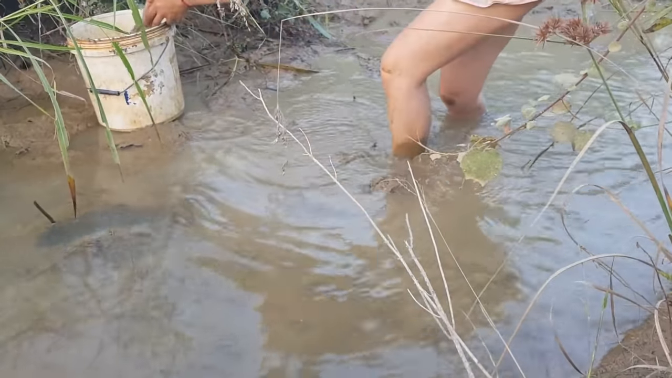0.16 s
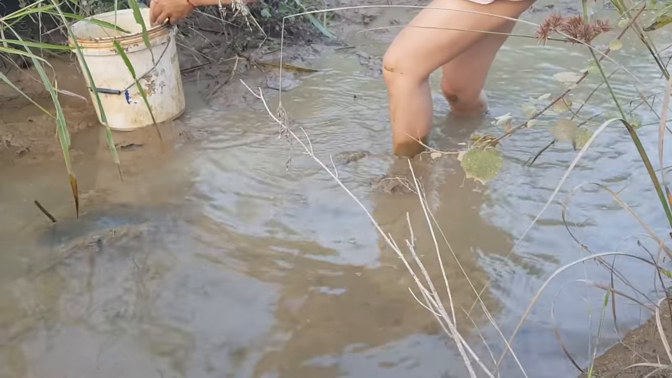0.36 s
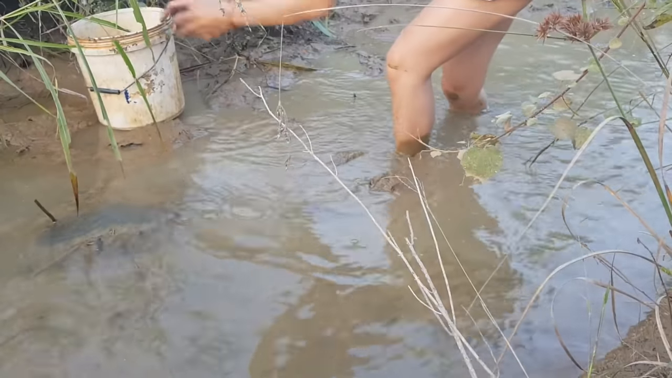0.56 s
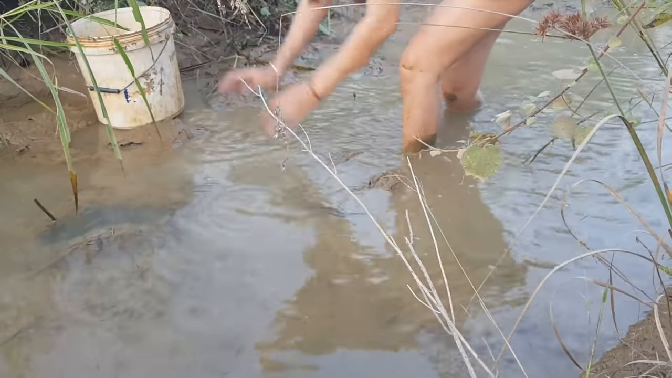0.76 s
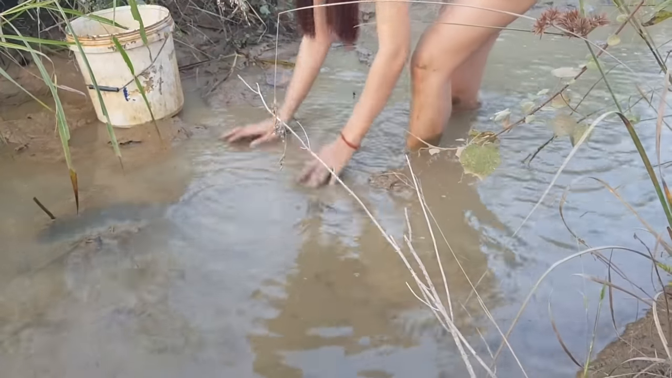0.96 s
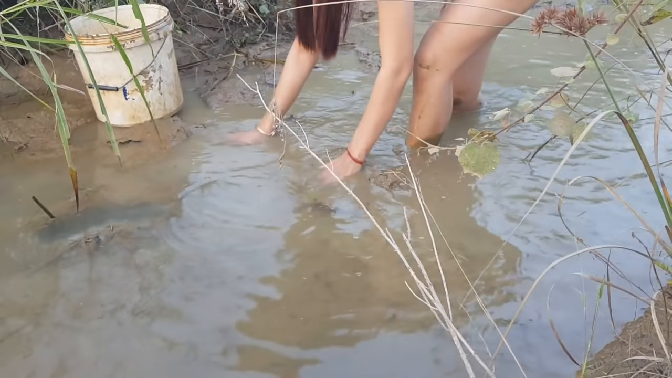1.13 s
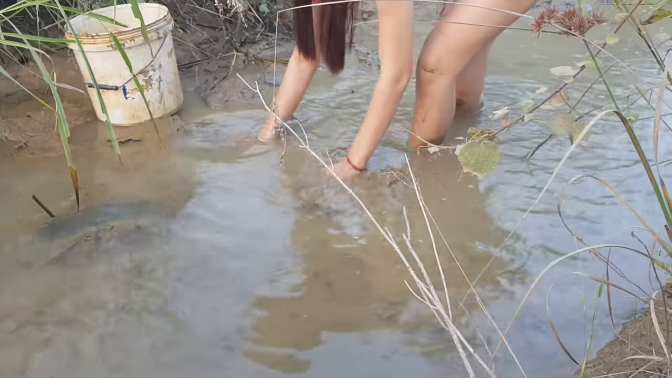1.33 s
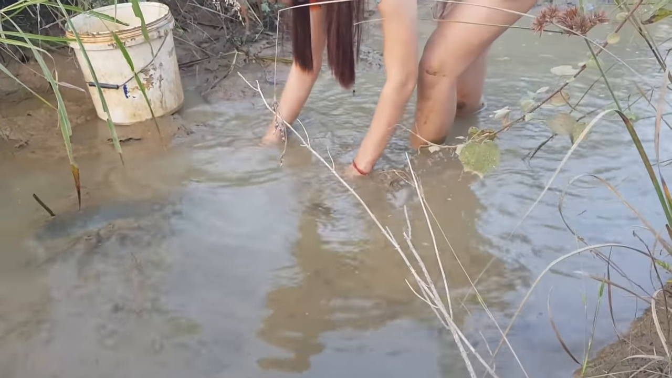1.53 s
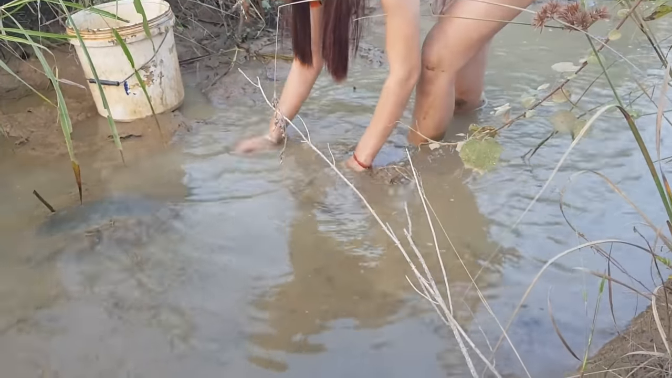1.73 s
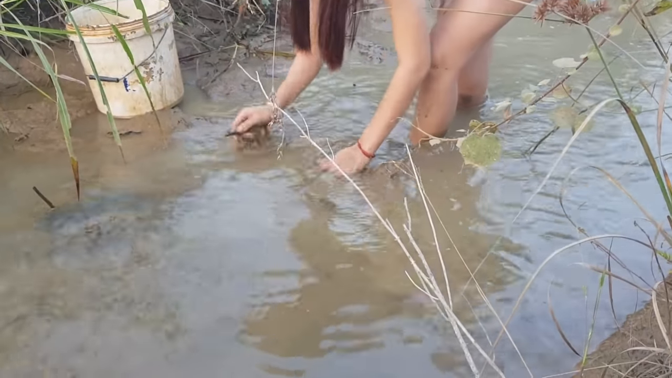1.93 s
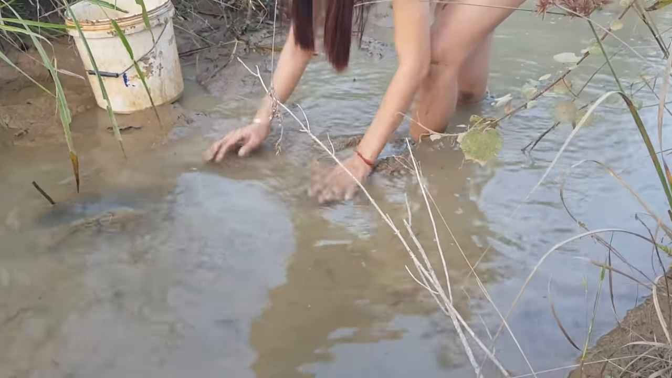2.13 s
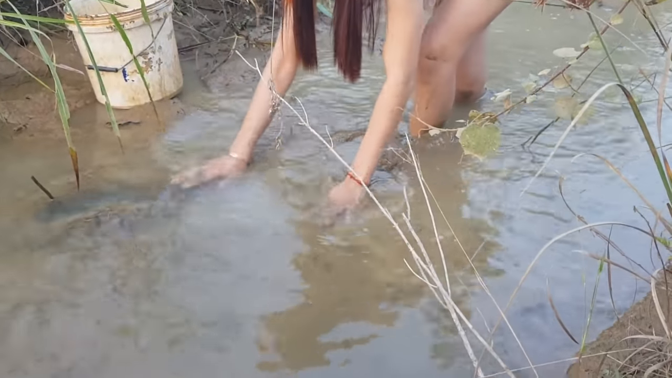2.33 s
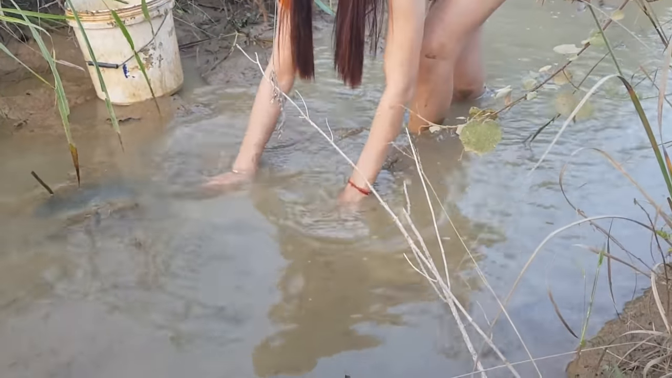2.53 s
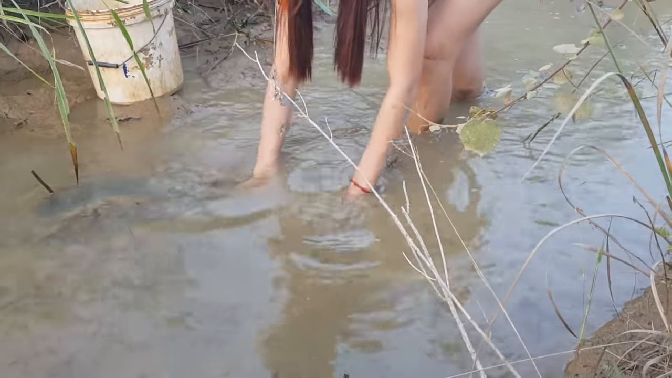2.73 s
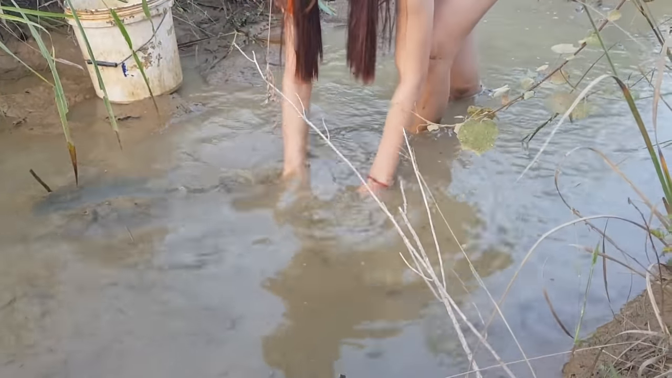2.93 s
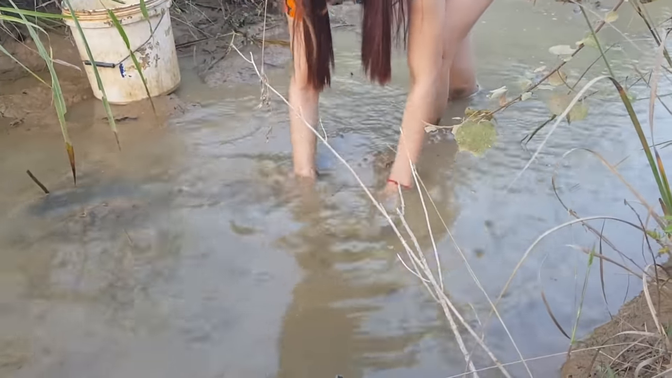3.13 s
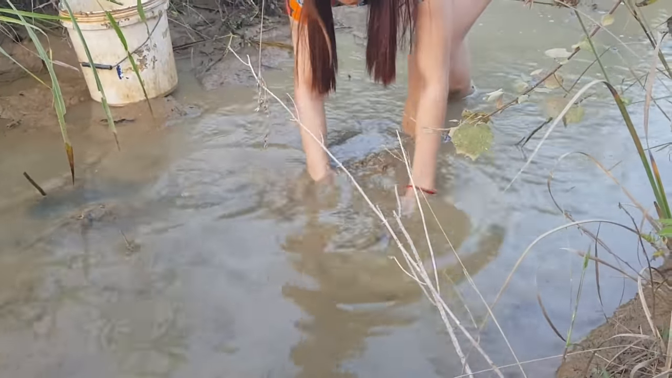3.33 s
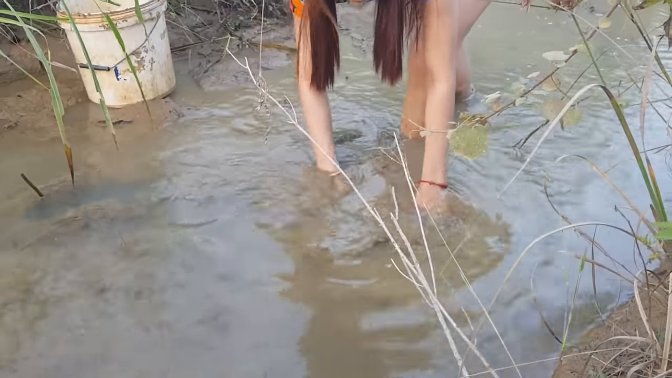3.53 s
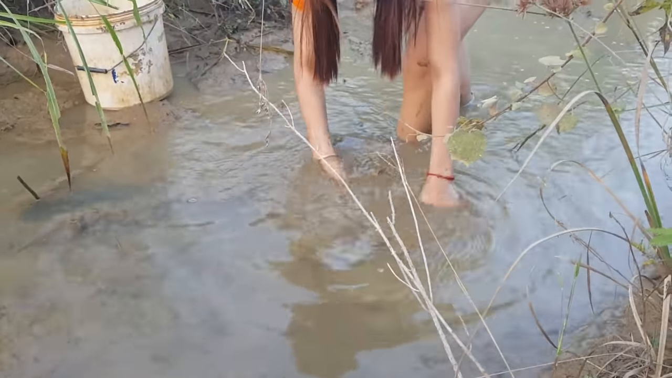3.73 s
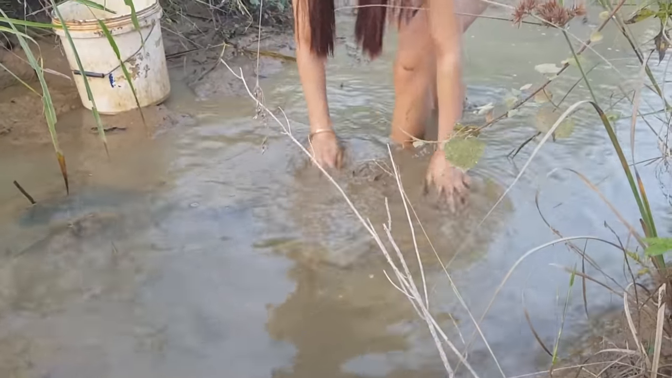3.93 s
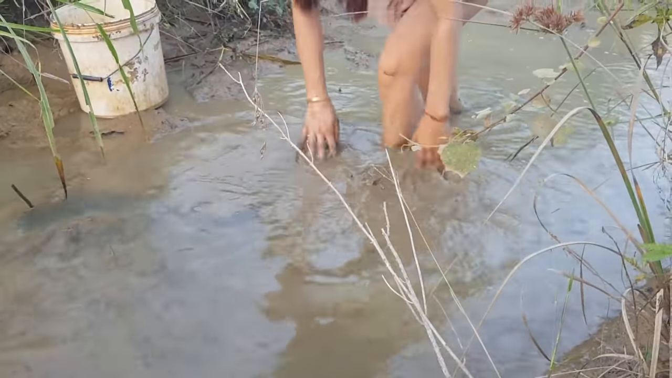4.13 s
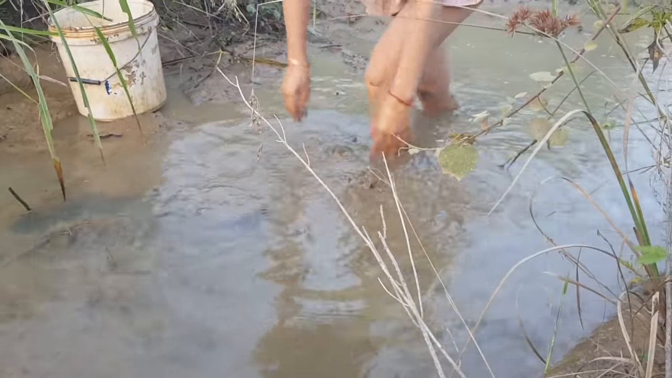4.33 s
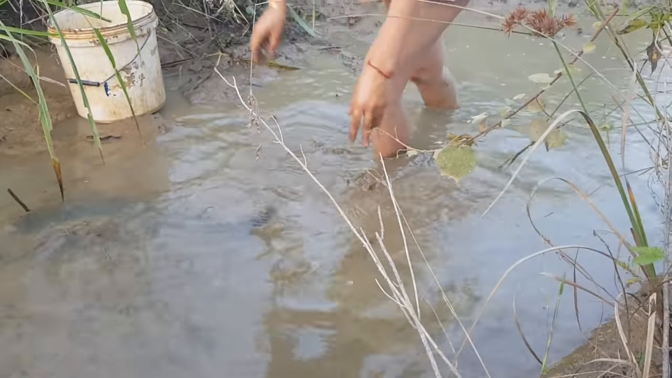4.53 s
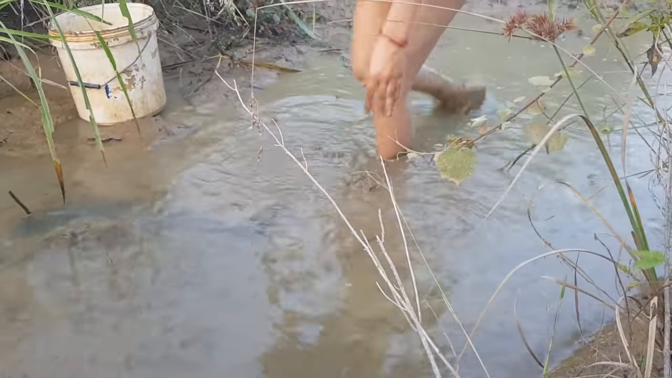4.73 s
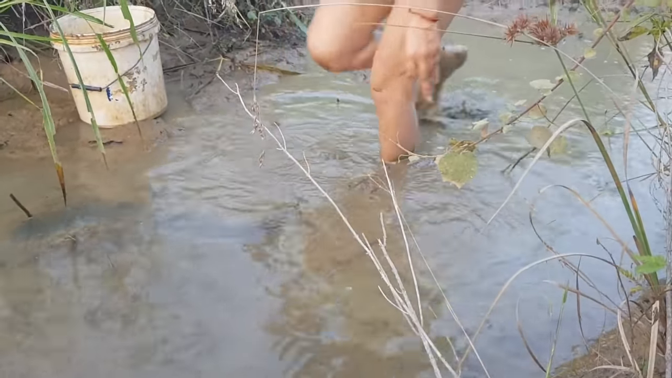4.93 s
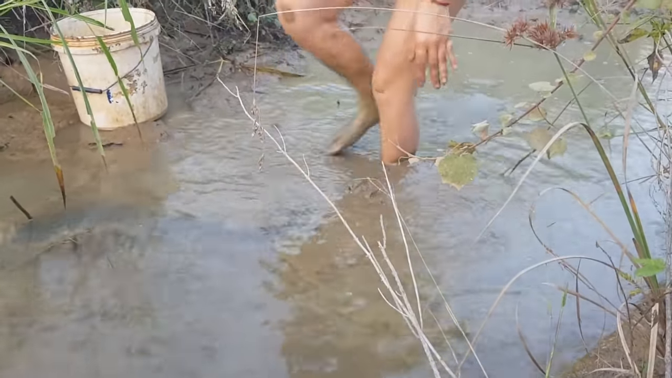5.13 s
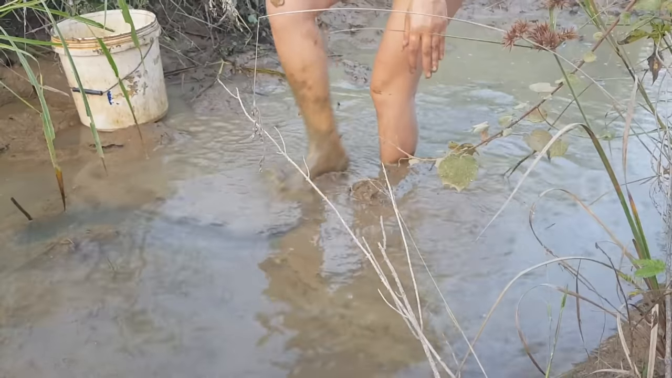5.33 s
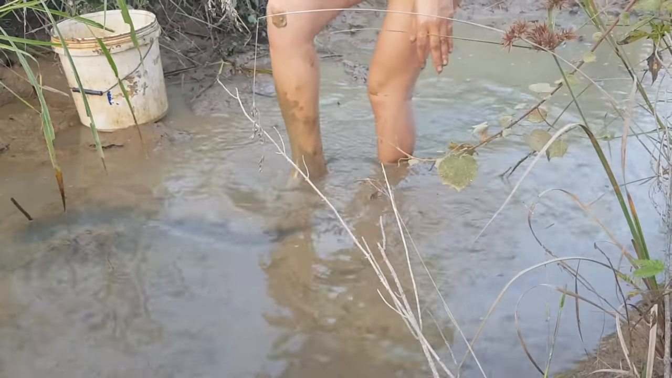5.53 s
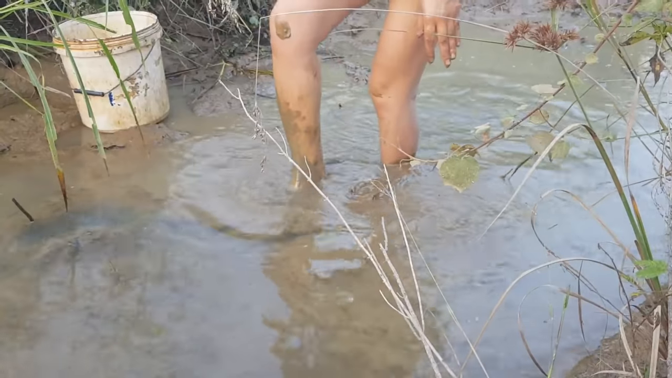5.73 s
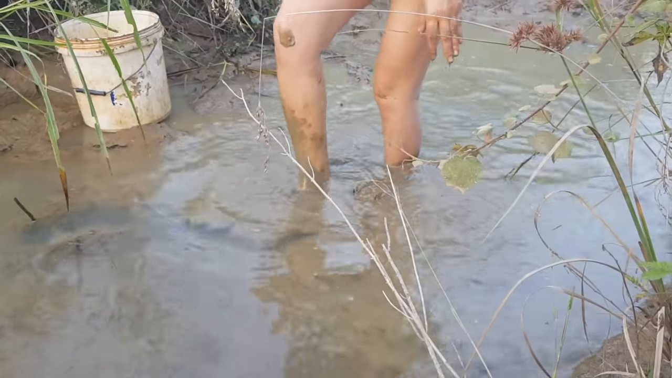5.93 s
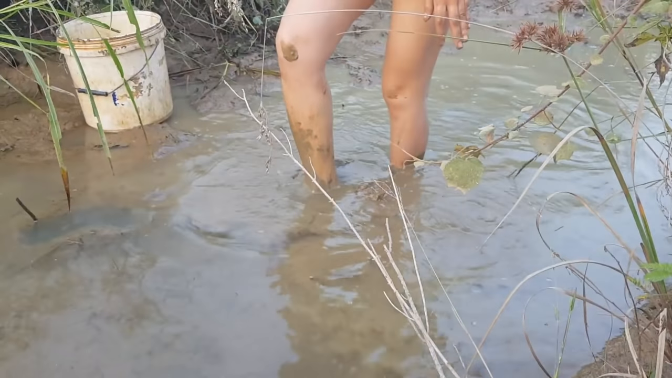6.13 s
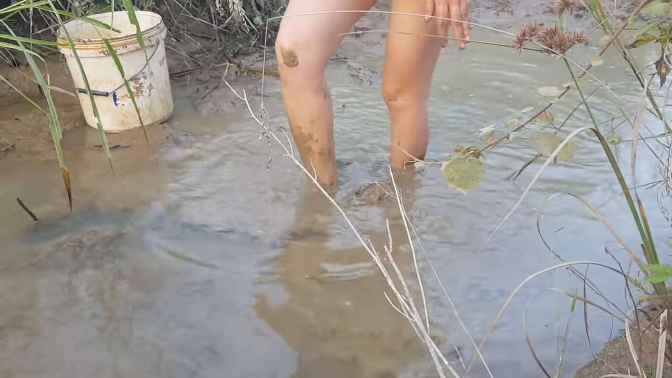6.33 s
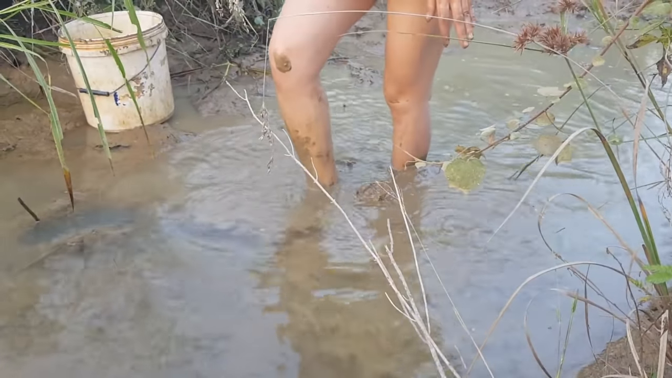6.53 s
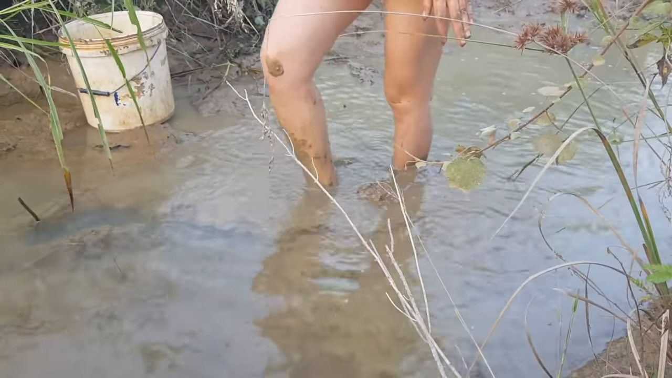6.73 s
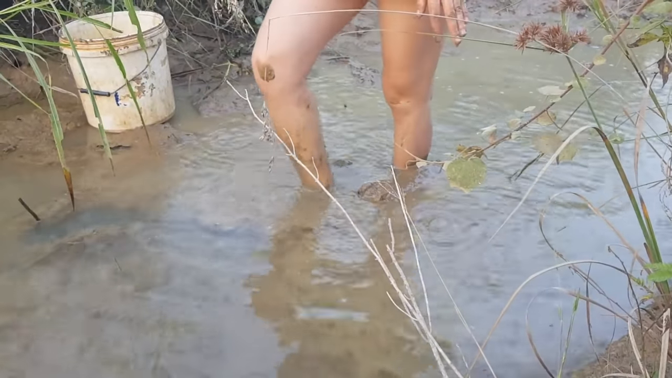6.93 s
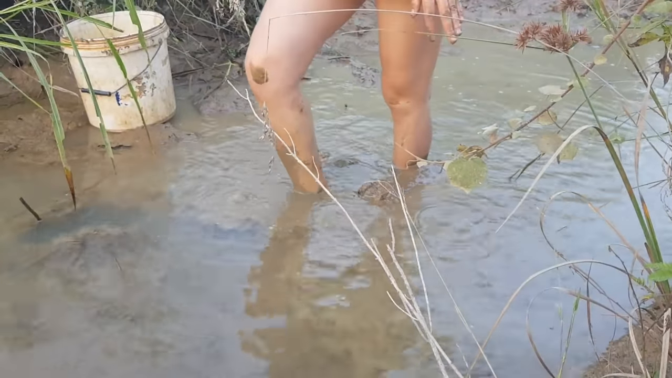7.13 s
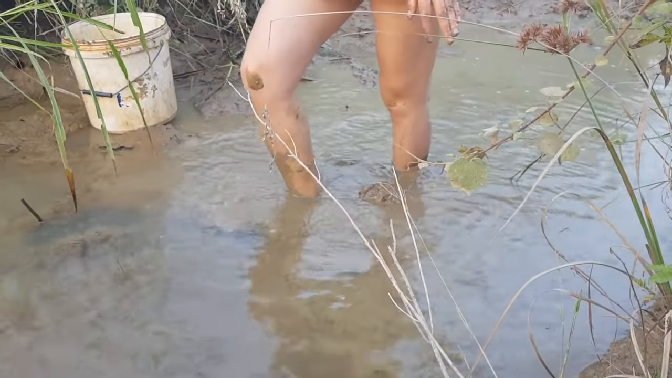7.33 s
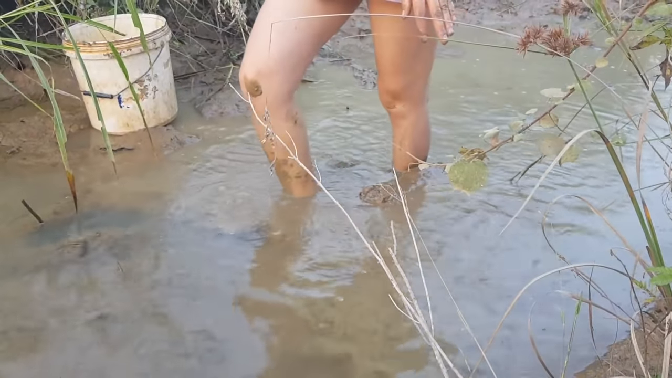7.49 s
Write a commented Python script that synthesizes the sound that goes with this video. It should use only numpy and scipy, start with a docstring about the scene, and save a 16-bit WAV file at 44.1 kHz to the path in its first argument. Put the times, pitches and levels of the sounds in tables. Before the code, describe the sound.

A stereo microphone near the water catches gentle sloshing, bright drips and rising bubble plops as someone gropes and wades in mud. Two dull bucket knocks with a handle rattle come first. Insects trill and chirp over low rumble, soft hiss and a far motor. Around two thirds through, a huge low thump rolls across open fields, silencing the crickets and leaving faint gurgles.

```python
"""Hands and bare feet stir a shallow muddy pond at dusk: noise sloshes, rising tones bubble, droplets snap.
Short decaying tones and a rattle of noise make the knocks on a plastic bucket.
Crickets, built from short high tones, sing on the left until a far blast: one slow wave and rolling noise.
A distant engine, a few gliding sine waves, drones through its gears over rumble and hiss."""
import sys
import numpy as np
from scipy import signal
from scipy.fft import rfft, irfft, next_fast_len
from scipy.io import wavfile
from scipy.ndimage import uniform_filter1d, map_coordinates

SR = 44100
rng = np.random.default_rng(int(sys.argv[2]) if len(sys.argv) > 2 else 0)


def file_out(sig):
    """Save sig as 16-bit WAV at sys.argv[1]."""
    # one column per channel
    cols = np.atleast_2d(sig).T
    # limit, then scale
    lim = np.clip(cols, -1, 1)
    pcm = np.round(lim * 32767).astype(np.int16)
    wavfile.write(sys.argv[1], SR, pcm)


N = 337806  # length of the scene in samples
BLAST_S = 5.365  # arrival of the blast


def amp(db):
    """Turns decibels into a gain."""
    return 10 ** (np.asarray(db) / 20)


def unit(x):
    """Scales x to an rms of 1."""
    return x / np.sqrt(np.mean(x ** 2) + 1e-20)


def along(points, hz):
    """Reads a curve of (Hz, value) points on a log frequency axis."""
    f, v = np.transpose(points)
    return np.interp(np.log(hz + 1), np.log(f + 1), v)


def curves(rows):
    """Gives one value per sample for each column after the time."""
    s, *cols = np.transpose(rows)
    return np.array([np.interp(np.arange(N) / SR, s, c) for c in cols])


def wobble(rate):
    """Draws a smooth random curve with rate knots a second."""
    knots = rng.standard_normal(int(N * rate / SR) + 4)
    return map_coordinates(knots, [np.arange(N) * rate / SR])


def filtered(x, response):
    """Multiplies the spectrum of x by a response of frequency."""
    m = next_fast_len(N + SR // 2)
    return irfft(rfft(x, m) * response(np.fft.rfftfreq(m, 1 / SR)), m)[..., :N]


def rush(spectrum, alike):
    """Makes stereo noise of rms 1 with a given colour and left-right likeness."""
    def shape(hz):
        return amp(np.where(hz < spectrum[0][0], -120, along(spectrum, hz)))

    def mid_and_side(hz):
        turn = np.arccos(np.clip(along(alike, hz), -1, 1)) / 2
        return shape(hz) * [np.cos(turn), np.sin(turn)]

    mid, side = filtered(rng.standard_normal((2, N)), mid_and_side)
    return unit(np.array([mid + side, mid - side]))


def patchy(x, depth_db, bins, frames):
    """Breaks noise into blotches of random gain in time and frequency."""
    z = signal.stft(x, nperseg=128)[2]
    field = uniform_filter1d(rng.standard_normal(z.shape[1:]), size=bins, axis=0)
    field = uniform_filter1d(field, size=frames, axis=1)
    return unit(signal.istft(z * amp(depth_db * unit(field)), nperseg=128)[1][:, :N])


def add(track, s, sound, pan_db=0):
    """Lays a short sound into a stereo track; a positive pan leans left."""
    part = track[:, round(s * SR):][:, :sound.shape[-1]]
    part += amp([[pan_db / 2], [-pan_db / 2]]) * sound[..., :part.shape[1]]


def spaced(x, lag_s):
    """Makes the left channel hear x later than the right by lag_s."""
    sides = np.array([[1], [-1]])
    return filtered(x, lambda hz: np.exp(-1j * np.pi * hz * lag_s * sides))


def engine():
    """A far exhaust: multiples of its firing rate, fluttering on their way through the air."""
    # The engine's course: (time [s], firing rate [Hz], level [dB], lope level [dB])
    engine_course = [(0, 88.3, -55.5, 4), (.3, 78.6, -56.5, 4), (.55, 62.4, -54, -34), (.9, 72.5, -49, -6),
                     (1.3, 75.05, -54.5, -5), (1.6, 61.2, -51, -25), (2.2, 59.1, -50, -17),
                     (3, 60.14, -50, -29), (4, 64.03, -50, -36), (4.5, 68.8, -50.5, -31),
                     (5.05, 73.94, -53, -33), (6.2, 74.53, -50, -34), (6.7, 82.57, -55.5, -14),
                     (7.2, 76.36, -53.5, 0), (7.66, 77.2, -54, -18)]
    # Its tones: (multiple of the firing rate, level [dB])
    engine_orders = [(1, 1), (1.5, -11), (2, -20), (2.5, -28.5)]
    hz, db, lope_db = curves(engine_course)
    phase = 2 * np.pi * np.cumsum(hz) / SR
    total = np.zeros(N)
    for multiple, level in list(engine_orders) + [(0.62, lope_db)]:  # the lope runs below the firing rate
        flutter = amp(level + 1.5 * wobble(14))
        total = total + flutter * np.sin(multiple * phase + .3 * wobble(6))
    return np.sqrt(2) * amp(db) * total


def air():
    """Open air is coloured noise: far traffic rumble, a smooth hiss and a low drone that swells."""
    # Open air: (time [s], far rumble level [dB], hiss level [dB])
    air_levels = [(0.0, -56, -71.5), (7.66, -56.5, -72)]
    # Colour of the rumble: (frequency [Hz], level [dB per Hz])
    rumble_colour = [(21, -32.5), (35, 5.5), (54, -10), (78, 2.5), (232, -12.5), (390, -28.5), (610, -32.5),
                     (1040, -51.5), (2500, -65), (3250, -104)]
    # Colour of the hiss: (frequency [Hz], level [dB per Hz])
    hiss_colour = [(350, -49), (600, -32), (778, -16.5), (1090, -8), (1580, -14), (5470, -22.5),
                   (6990, -22.5), (15600, -19)]
    # Likeness of left and right: (frequency [Hz], likeness [-1 to 1])
    air_likeness = [(60, 0.87), (130, 0.92), (290, 0.75), (640, 0.28), (1400, -0.42), (3000, -0.14)]
    # Faint low band: (time [s], level [dB])
    drone_levels = [(0, -83), (3.4, -107), (3.6, -72.5), (4.1, -88), (4.9, -85), (5.4, -78.5), (7.66, -78)]
    # Colour of that band: (frequency [Hz], level [dB per Hz])
    drone_colour = [(380, -40), (450, -0.5), (560, -3), (650, -14), (800, -120)]
    rumble_db, hiss_db = curves(air_levels)
    rumble = amp(rumble_db) * patchy(rush(rumble_colour, air_likeness), 0.44, bins=1, frames=60)
    hiss = amp(hiss_db) * rush(hiss_colour, air_likeness)
    drone = amp(curves(drone_levels)[0]) * rush(drone_colour, air_likeness)
    return rumble + hiss + drone


def near_crickets():
    """Each chirp is a short high tone with a rough strength, as the wing's file scrapes unevenly."""
    # Crickets, two on a steady beat and one uneven: (pitch [Hz], chirps a phrase [count],
    # gap between chirps [s], level [dB], phrase starts [s])
    cricket_phrases = [(7150, 3, .051, -69.5, .1665 + .2163 * np.arange(25)),
                       (7140, 2, .052, -69, .014 + .2317 * np.arange(24)),
                       (7590, 2, .055, -70.5, [.118, .344, .59, .865, 1.11, 1.344, 1.59, 1.806, 2.063, 2.32, 2.585, 2.816, 3.056, 3.293, 3.538, 3.772, 4.012, 4.248, 4.49, 4.72, 4.96, 5.205])]
    sag_hz_per_s, scatter_s = 2600, 0.0022  # fall of pitch within a chirp; unsteadiness of the beat
    hush_db_per_s = 150  # fading after the blast
    out, t = np.zeros((2, N)), np.arange(round(0.03 * SR)) / SR
    soft = np.sin(np.pi * t / t[-1]) ** .8
    for hz, count, gap, db, starts in cricket_phrases:
        sag = sag_hz_per_s * (3 if hz > 7400 else 1)  # the highest cricket sags most
        for s in [start + k * gap for start in starts for k in range(count)]:
            rasp = amp(3 * unit(uniform_filter1d(rng.standard_normal(len(t)), size=70)))
            cycles = (hz + sag * (t[-1] - t) / 2) * t * (1 + 0.0054 * rng.normal())
            stroke = soft * rasp * np.sin(2 * np.pi * cycles + rng.uniform(0, 3.3))
            late = abs(rng.normal(0, scatter_s)) - .004
            add(out, s + late, amp(db + rng.normal(0, 0.55)) * stroke, pan_db=21.5)
    out = out * amp(-hush_db_per_s * np.clip(np.arange(N) / SR - BLAST_S, 0, None))  # the blast hushes them
    return out * amp(wobble(25) + 1.2 * wobble(3.04))  # their strength wavers


def far_crickets():
    """Many far crickets blur into one flickering band of noise."""
    # Far crickets together: (time [s], level [dB])
    chorus_levels = [(0, -71.5), (2, -72), (5.4, -70.5), (5.6, -99.5), (7.05, -95.5), (7.3, -78),
                     (7.66, -92)]
    colour = [(6300, -31), (6900, -4.5), (7150, 0.5), (7600, 0.0), (7900, -11.0), (8300, -47.0)]
    return amp(curves(chorus_levels)[0] + 1.3 * wobble(36)) * rush(colour, [(7000, 0.013)])


def trills():
    """Trilling insects: a high tone beats in pulses, and each pulse slides down in pitch."""
    # Trills: (start [s], end [s], start pitch [Hz], end pitch [Hz], slide [Hz], pulses [per s], level [dB])
    trill_rows = [(0, 0.46, 4490, 4550, 405, 63, -82), (1.148, 1.68, 4670, 4680, 408, 50, -84.5),
                  (2.491, 3.059, 4640, 4550, 395, 96, -84), (0.619, 0.718, 9400, 9240, 303, 65, -60),
                  (2.607, 2.703, 9520, 9520, 446, 55, -62), (2.797, 2.907, 9100, 9470, 300, 49, -68),
                  (3.5, 3.557, 9030, 9530, 298, 61, -67)]
    # Single pips of the high insect: (time [s], pitch [Hz], level [dB])
    pip_rows = [(2.727, 9300, -65), (3.943, 9360, -72), (4.19, 9450, -66), (4.428, 9480, -69)]
    pip_s = 0.0166  # length of a pip, which is one pulse
    pips = [(s, s + pip_s, hz, hz, 300, 1 / pip_s, db) for s, hz, db in pip_rows]
    out = np.zeros((2, N))
    for start, end, hz0, hz1, width_hz, rate, db in list(trill_rows) + pips:
        t = np.arange(round((end - start) * SR)) / SR
        beat = t * rate % 1
        blur = 2.12 * (hz0 < 6000)  # the lower trill is far off and blurred
        hz = hz0 + (hz1 - hz0) * t / t[-1] + width_hz * (.5 - beat)
        jitter = unit(uniform_filter1d(rng.standard_normal((2, len(t))), size=60))
        hz = hz + (0.284 + 0.185 * blur) * width_hz * jitter
        tone = np.sin(2 * np.pi * np.cumsum(hz, axis=1) / SR)
        pulses = blur + np.sin(np.pi * beat) ** 2
        swell = np.sin(np.pi * t / t[-1]) ** .5
        add(out, start, amp(db + 3.5 * wobble(39.0)[:len(t)]) * swell * pulses * tone)
    return out


def insects():
    """All insects: near crickets, the far chorus and the trills."""
    return near_crickets() + far_crickets() + trills()


def movement(calm_db):
    """Gives levels in dB of gurgle, slosh and spray: each movement swells, holds and settles."""
    # Hands and feet moving the water: (start [s], swell [s], hold [s], settling speed [factor],
    # gurgle level [dB], slosh level [dB], spray level [dB])
    water_moves = [(0, 0.0021, 0.0093, 1, -64.5, -70, -89), (0.42, 0.052, 0.044, 0.86, -59, -66.5, -70),
                   (0.55, 0.064, 0.072, 0.72, -76, -89, -65.5), (1.047, 0.035, 0.03, 1.5, -71.5, -63, -53),
                   (1.914, 0.025, 0.13, 1.01, -77.5, -75.5, -73),
                   (2.076, 0.019, 0.083, 1.2, -82, -67.5, -89), (2.153, 0.11, 0.019, 1.4, -64, -68, -70),
                   (2.291, 0.041, 0.025, 1.1, -71, -66.5, -56), (2.371, 0.043, 0.1, 0.83, -72, -68.5, -73),
                   (4.007, 0.083, 0.039, 0.9, -90, -68, -69.5),
                   (4.083, 0.075, 0.048, 0.71, -63, -65.5, -78),
                   (4.82, 0.048, 0.026, 1.12, -67.5, -61, -65), (4.879, 0.082, 0.16, 1.14, -57, -55, -61.5),
                   (5.153, 0.013, 0.076, 1, -96, -66.5, -66), (5.281, 0.045, 0.047, 1, -76, -58, -65.5),
                   (5.44, 0.026, 0.026, 1.9, -80, -64.5, -70), (5.593, 0.16, 0.87, 0.85, -80, -84.5, -77),
                   (6.612, 0.38, 0.578, 1.01, -79, -104, -100)]
    # Settling before the speed factor: gurgle, slosh, spray [dB per s]
    settle_db_per_s = (213, 103, 199)
    swell_db = 18  # a movement swells through this range
    t, power = np.arange(N) / SR, amp(calm_db)[:, None] ** 2
    for s, swell, hold, speed, *db in water_moves:
        rising = swell_db * np.clip(1 - (t - s) / max(swell, .002), 0, None)
        rising = rising + 200 * (t < s)  # silent before it starts
        falling = speed * np.outer(settle_db_per_s, np.clip(t - s - swell - hold, 0, None))
        power = power + amp(np.array(db)[:, None] - rising - falling) ** 2
    return 10 * np.log10(power)


def fizz(level_db, hz, octaves, cycles, count):
    """Scatters many tiny bubbles at random, each a short tone that rises and fades."""
    draw, k = rng.random((count, 4)), np.arange(900)
    start = (draw[:, :1] * (N - 900)).astype(int)
    step = hz * 2 ** (octaves * (2 * draw[:, 1:2] - 1)) / SR  # cycles per sample
    age = k * step / cycles
    size = amp(-2.4 * np.log(draw[:, 2:3]))  # a few are much stronger
    grain = size * age * np.exp(-4 * age) * np.sin(2 * np.pi * k * step * (1 + 0.134 * age))
    pan = amp(1.1 * (draw[:, 3:] + 1.0))
    pair = [np.bincount((start + k).ravel(), (grain * g).ravel(), N) for g in (pan, 1 / pan)]
    return amp(level_db) * unit(np.array(pair))


def surface(x):
    """The bounce off the water surface cancels one band of a sound born there."""
    dip_hz, half_width_hz, share = 2530, 145, 0.91
    return filtered(x, lambda hz: 1 - share / (1 + ((hz - dip_hz) / half_width_hz) ** 2))


def placed(x):
    """The wader works left of centre at first, then a little to the right, heard as a tiny time lag."""
    turn_s, first_lag_s, later_lag_s = 2.8, -.00011, .00006
    early = np.arange(N) < turn_s * SR
    return spaced(x * early, first_lag_s) + spaced(x * ~early, later_lag_s)


def stirring():
    """Moving water: blotchy noise in three bands, with small bubbles and fine patter scattered over it."""
    # Colours of the three bands: (frequency [Hz], level [dB per Hz])
    gurgle_colour = [(500, -10), (800, -12.5), (1300, 3.5), (2100, -0.5), (2600, -24), (3200, -41)]
    slosh_colour = [(2200, -11), (2700, -5.5), (3500, 0), (4300, 0.5), (5200, -6.5), (6500, -1),
                    (8000, -10.5)]
    spray_colour = [(6000, -2.5), (7500, 2.5), (10000, -9.5), (12000, -6.5), (15500, -14)]
    # The pond left alone: gurgle, slosh, spray level [dB]
    calm_levels = (-86.5, -81.5, -82)
    gurgle_db, slosh_db, spray_db = movement(calm_levels)
    gurgle = amp(gurgle_db) * patchy(rush(gurgle_colour, [(1000, 0.2)]), 7.1, bins=2, frames=6)
    slosh = amp(slosh_db) * patchy(rush(slosh_colour, [(1000, 0.15)]), 4.4, bins=9, frames=3)
    spray = amp(spray_db) * patchy(rush(spray_colour, [(1000, .2)]), 3.5, bins=10, frames=5)
    gurgle_db, slosh_db, spray_db = movement(np.full(3, -120))  # still water throws almost no grains
    small = fizz(gurgle_db - 1.5, 1080, 0.7, 22, count=2000)
    small = small + fizz(slosh_db - 3, 4050, 0.65, 15, count=900)
    patter = fizz(spray_db - 8.0, 7040, 0.69, 23.0, count=350)
    patter = patter + fizz(slosh_db - 11, 3730, 0.75, 5.5, count=450)
    return gurgle + slosh + spray + placed(surface(small + patter))


def bubble(hz, life, rise, fade_db, bend, ripple_db):
    """One air pocket rings, its pitch climbing as it nears the surface, then it bursts."""
    age = np.linspace(0, 1, round(life * SR))
    swell = 0.47 / life / hz + 0.063 * rise  # share of life; a steep climb swells slowly
    shape = (1 - np.exp(-age / swell)) * amp(-fade_db * age / (1 + 0.14 * rise))
    shape = shape * np.sqrt(1 - age ** 4)  # the burst ends it
    ripple = unit(uniform_filter1d(rng.standard_normal((2, len(age))), size=130))
    pitch = hz * 2 ** (rise * age ** bend)  # a larger bend climbs later
    return shape * amp(ripple_db * ripple) * np.sin(2 * np.pi * np.cumsum(pitch) / SR)


def bubbles():
    """Free bubbles live for a count of cycles; gulps of air from the mud dwell low, then swoop up."""
    # Free bubbles: (time [s], level [dB], start pitch [Hz], pitch rise [octaves])
    bubble_rows = [(0.224, -63, 920, 1.3), (0.251, -58, 1110, 0.15), (.643, -64.5, 900, 0.25),
                   (.712, -67, 900, 0.26), (.77, -67.5, 926, 0.65), (.885, -67, 1010, 0.22),
                   (.943, -70, 1060, .6), (1.104, -54, 1500, 0.4), (1.172, -61.5, 1830, 0.12),
                   (1.984, -58.5, 940, 0.088), (2.045, -64, 1400, .05), (2.198, -62, 1140, 0.1),
                   (2.212, -67, 826, .1), (2.242, -57, 1450, .1), (2.245, -56.5, 897, 1.31),
                   (2.387, -56.5, 1070, 0.48), (2.438, -39.5, 1200, 0.27), (2.441, -56.5, 646, 0.18),
                   (2.77, -65, 1186, 0.38), (2.926, -45, 1165, 0.67), (3.028, -67.5, 650, 0.064),
                   (3.138, -61, 1255, 0.73), (3.143, -52.5, 1655, 0.091), (3.74, -63.5, 1370, 0.2),
                   (4.078, -54.5, 1650, 0.046), (4.084, -57, 1096, 0.085), (4.131, -37.5, 1244, 0.94),
                   (4.164, -54.5, 862, 0.12), (4.189, -56, 775, 0.059), (4.197, -52, 1186, 0.2),
                   (4.285, -51.5, 1350, 0.24), (4.845, -61.5, 1790, .05), (4.852, -53.5, 944, 0.22),
                   (4.983, -43, 1450, .15), (5.068, -47, 1540, 0.093), (5.628, -54, 1110, 0.11),
                   (5.937, -56.5, 1133, 0.23), (6.655, -64, 1056, 0.52), (6.68, -68, 1170, 0.041),
                   (6.8, -65.5, 867, 0.9), (6.94, -69, 1035, 0.68), (6.95, -65, 820, 0.66),
                   (7.03, -67, 950, 0.63), (7.165, -63, 806, 0.91), (7.095, -63.5, 1077, 0.26),
                   (7.128, -74, 1400, .6), (7.27, -68, 1191, 0.11), (7.3, -65, 1050, .5),
                   (7.33, -66, 740, 0.66), (7.37, -64, 1160, 0.12), (7.489, -64.5, 920, 0.38),
                   (7.523, -63, 1500, 0.19)]
    # Air escaping from the mud round the foot: (time [s], level [dB], length [s], pitch rise [octaves])
    gulp_rows = [(6.706, -61, 0.048, 0.11), (6.768, -53.5, 0.065, 0.61), (6.825, -56, 0.054, 0.15),
                 (6.894, -59, 0.06, 0.56), (7.035, -61.5, 0.061, 1.5), (7.143, -65, 0.053, 0.22),
                 (7.194, -60, 0.052, 1.6), (7.285, -61, 0.0485, 0.36), (7.342, -63, 0.085, 0.069),
                 (7.377, -60.5, 0.039, 1), (7.426, -61, 0.052, 0.11)]
    out = np.zeros((2, N))
    for s, db, hz, rise in bubble_rows:
        life = (20 + 13 * rise) / hz  # counted in cycles of the start pitch
        sound = bubble(hz, life, rise, fade_db=14, bend=1.5, ripple_db=4.2)
        add(out, s, amp(db) * sound, pan_db=1.5)
    for s, db, life, rise in gulp_rows:
        hz = 515.6 * amp(0.37 * rng.normal())
        add(out, s, amp(db) * bubble(hz, life, rise, fade_db=14.5, bend=2.43, ripple_db=5.5))
    return spaced(out, -0.000025)


def bucket():
    """Knocks ring the air column and the plastic wall as fading tones; the wire handle rattles as noise."""
    # Ringing tones: (pitch [Hz], time to fade by 60 dB [s], attack [s])
    bucket_modes = [(275.3, 0.077, 0.017), (150, 0.024, 0.013), (647, 0.044, 0.0071), (1380, 0.024, 0.0001)]
    # Blows: (time [s], level of each of the four tones in turn [dB], rattle level [dB])
    bucket_blows = [(0.4392, -9.5, -18, -36, -34, -57), (0.504, -21.5, -7, -27.5, -25.5, -30.5),
                    (.676, -41.5, -15, -78, -66, -62)]
    # Colour of the rattle: (frequency [Hz], level [dB per Hz])
    rattle_colour = [(300, -5.5), (1500, -8), (2600, -14.5), (4500, -17.5), (6500, -9.5), (9000, -19.5),
                     (15500, -29)]
    out, t = np.zeros((2, N)), np.arange(SR // 4) / SR
    for s, *mode_db, rattle_db in bucket_blows:
        ring = np.zeros(len(t))
        for db, (hz, t60, attack) in zip(mode_db, bucket_modes):
            ring += amp(db - 60 * t / t60) * (1 - np.exp(-t / attack)) * np.sin(2 * np.pi * hz * t)
        noise = rush(rattle_colour, [(300, 0.73), (6000, 0.26)])[:, :len(t)]
        rattle = amp(rattle_db - 60 * t / 0.068) * (1 - np.exp(-t / 0.00088)) * noise
        add(out, s, ring + rattle)
    return spaced(out, -0.00015)


def drops():
    """A droplet is a short ping in a burst of noise gathered round the same pitch."""
    # Droplets snapping on the surface: (time [s], level [dB], centre [Hz], width [octaves])
    drop_rows = [(1.0773, -39, 7100, 0.93), (1.094, -48, 12500, 0.33), (1.111, -51, 6500, 0.54),
                 (1.217, -55, 3600, 0.15), (1.933, -47, 6370, 0.21), (1.961, -51, 1736, 0.17),
                 (1.973, -55, 3700, 0.3), (2.042, -56.5, 3510, 0.1), (2.105, -51, 5870, 0.48),
                 (2.114, -52, 3800, 0.22), (2.129, -60, 3670, 0.13), (2.155, -53, 3530, .2),
                 (2.159, -53, 5304, 0.15), (2.172, -50.5, 3580, 0.16), (2.172, -57, 2010, .2),
                 (2.173, -44.5, 6400, 0.21), (2.2222, -46.5, 4260, 0.35), (2.263, -50, 4250, 0.16),
                 (2.33, -58, 3240, 0.54), (2.339, -45.5, 4400, .08), (2.3352, -40, 6600, 1.2),
                 (2.3443, -32.5, 12500, 0.31), (2.343, -35.5, 5960, 0.61), (2.362, -44, 6650, 0.62),
                 (2.433, -52, 4250, 0.19), (3.206, -57, 1657, 0.11), (3.739, -64.5, 2800, 1.4),
                 (4.04, -52, 4300, 0.24), (4.0641, -58, 4020, 0.25), (4.088, -46, 3760, 0.2),
                 (4.0922, -46.5, 3710, .15), (4.131, -49.5, 3060, 0.79), (4.152, -53, 2980, 0.38),
                 (4.167, -52, 3530, 0.23), (4.169, -50, 7660, .65), (4.223, -52, 1980, 0.22),
                 (4.2587, -61, 2007, 0.12), (4.277, -48, 2220, 0.27), (4.8703, -47, 3530, 0.11),
                 (4.931, -44.5, 3330, 0.99), (4.9316, -43, 2200, 0.13), (4.955, -44, 1400, 0.31),
                 (4.9702, -20.5, 3580, 0.59), (4.9703, -30.5, 2170, 0.86), (4.989, -49.5, 803, 0.085),
                 (5.0195, -47, 2040, 0.15), (5.032, -55.5, 673, 0.58), (5.048, -49, 7450, .15),
                 (5.057, -34, 3080, 0.44), (5.0578, -31.5, 2070, 0.58), (5.066, -47, 1126, 0.23),
                 (5.2972, -68, 2270, 0.084), (5.3148, -47, 3560, 0.46), (5.3209, -24, 3120, 0.3),
                 (5.3212, -35.5, 2166, 0.18), (5.319, -44, 6100, 0.29), (5.346, -49, 3000, .15),
                 (5.356, -52, 3900, 0.32), (5.4788, -53, 3540, 0.26), (5.4866, -53, 3400, 0.43),
                 (5.4919, -48.5, 2170, 0.12), (5.7318, -58.5, 7100, .52), (5.7881, -54.5, 6650, 0.77),
                 (5.97, -65, 3840, 0.13), (6.071, -60, 4530, 0.24), (6.1277, -55.5, 7040, .3),
                 (6.157, -62, 7390, 0.17), (6.1754, -55, 6400, 0.27), (6.4157, -59.5, 11000, 0.19),
                 (6.498, -59, 6200, 0.87), (6.662, -62, 12610, 0.25), (7.133, -66, 2900, 0.18)]
    ping_late_s = .001
    out, t = np.zeros((2, N)), np.arange(4096) / SR
    f = np.fft.rfftfreq(len(t), 1 / SR) + 1
    for s, db, hz, octaves in drop_rows:
        # high and hard drops fade sooner
        t60 = 0.1 * (2000 / hz) ** 0.068 * amp(-0.26 * max(db + 50, 0))
        band = 1 / (1 + (np.log2(f / hz) / octaves) ** 2) ** 2
        a, b = irfft(rfft(rng.standard_normal((2, len(t)))) * band)
        shape = (1 - np.exp(-t / 0.00067)) * amp(-60 * t / t60)
        shape = shape * (1 + 1.58 * np.exp(-((t - .002) / 0.0011) ** 2))  # the first contact stands out
        burst = unit(np.array([a + .5 * b, a - .5 * b]) * shape) * np.sqrt(np.mean(shape ** 2))
        age = np.clip(t - ping_late_s, 0, None) * hz  # in cycles
        ping = np.sin(2 * np.pi * age) * np.exp(-.8 * octaves * age) * (1 - np.exp(-age / 1.5))
        # heavy low drops ring clear, with less hiss round the ping
        hiss_db = -5 - .8 * max(db + 40, 0) * (hz < 5000)
        add(out, s, amp(db) * (amp(hiss_db) * burst + ping / ping.max()), pan_db=0.5)
    return placed(surface(out))


def blast():
    """One slow pressure wave whose lowest part arrives last, then echoes that die band by band."""
    # Direct wave and its echo: (delay [s], level [dB])
    pressure_waves = [(0, -9.5), (0.046, -20.5)]
    # Echoes from the fields: (frequency [Hz], first level [dB], first time to fade by 60 dB [s],
    # late level [dB], late time to fade by 60 dB [s])
    field_echoes = [(20, 3, 0.99, -2.5, 2.74), (60.4, -11, 0.22, -10, 4.74), (155, -7.5, 0.96, -11, 1.63),
                    (292, -11, 0.97, -29, 5.36), (710, -31.5, 1, -42, 2.68),
                    (1270, -28.5, 0.41, -36.5, 1.8), (1990, -35, 0.73, -54, 0.91),
                    (2820, -50, 0.42, -52, 0.93), (4200, -70, 0.15, -73, 1.2)]
    out, t = np.zeros((2, N)), np.arange(SR // 5) / SR
    cycles = 15 * t + 33 * np.minimum(t, .028)  # 48 Hz at first, then 15 Hz
    wave = (t / .0165) ** 2 * np.exp(2 - 2 * t / .0165) * np.sin(2 * np.pi * cycles)
    for delay, db in pressure_waves:
        add(out, BLAST_S + delay, amp(db) * wave)
    noise = patchy(rush([(15, 0)], [(100, 0.988), (300, 0.96), (1500, 0.4)]), 2.2, bins=2, frames=9)
    hz, t, z = signal.stft(noise[:, :3 * SR], SR, nperseg=1024)
    echo_columns = [along(np.array(field_echoes)[:, [0, k]], hz)[:, None] for k in range(1, 5)]
    first_db, first_t60, late_db, late_t60 = echo_columns
    fade = np.hypot(amp(first_db - 60 * t / first_t60), amp(late_db - 60 * t / late_t60))
    tail = signal.istft(z * fade, SR, nperseg=1024)[1]
    t = np.arange(tail.shape[1]) / SR
    add(out, BLAST_S + 0.00397, (1 - np.exp(-(t / 0.0062) ** 2)) * tail)
    return out


def scene():
    """Adds up all the sources."""
    return engine() + air() + insects() + stirring() + bubbles() + bucket() + drops() + blast()


def record(dry):
    """Keeps nothing above a top frequency."""
    top_hz = 15790
    return filtered(dry, lambda hz: hz < top_hz)


dry = scene()
out = record(dry)
file_out(out)
```